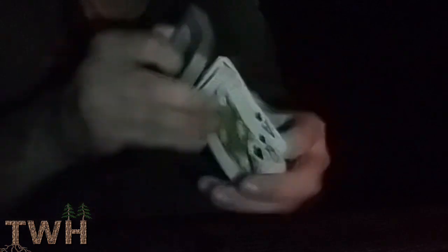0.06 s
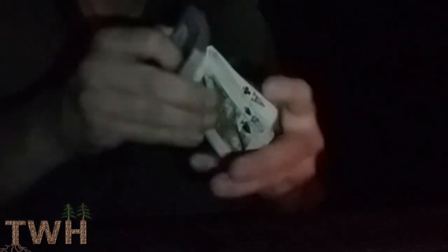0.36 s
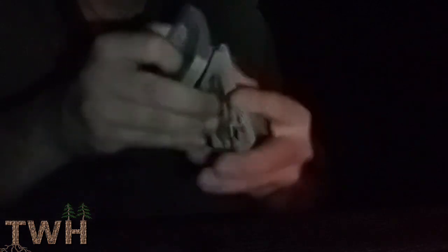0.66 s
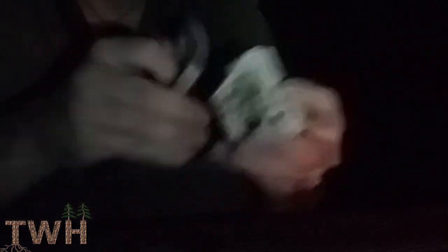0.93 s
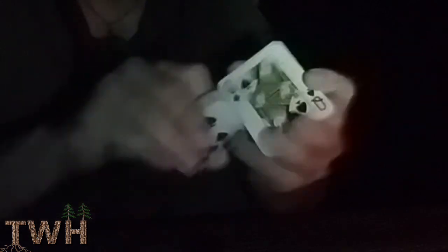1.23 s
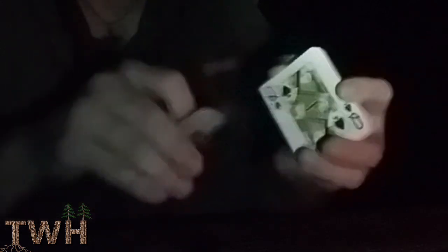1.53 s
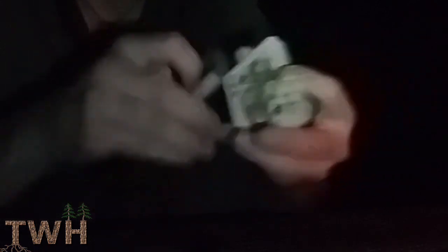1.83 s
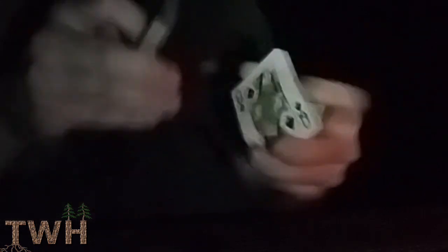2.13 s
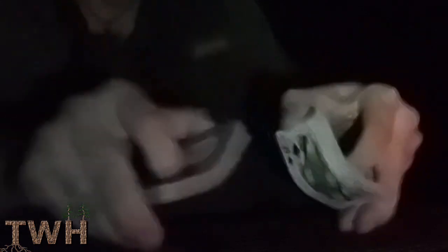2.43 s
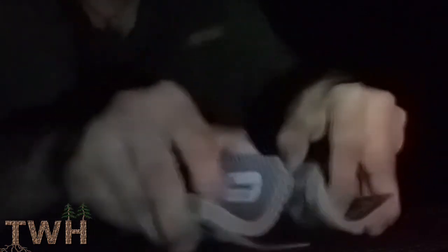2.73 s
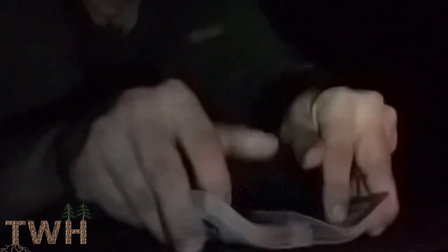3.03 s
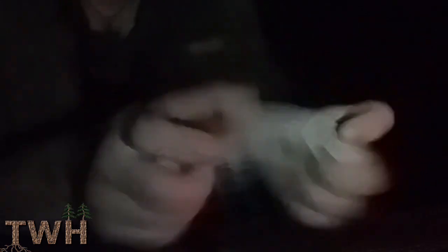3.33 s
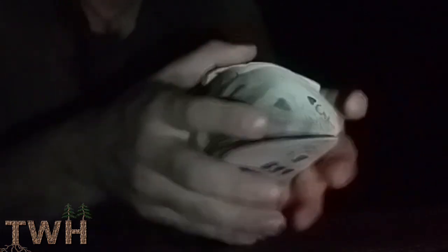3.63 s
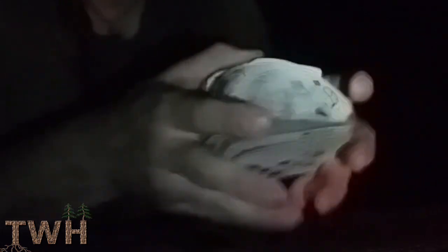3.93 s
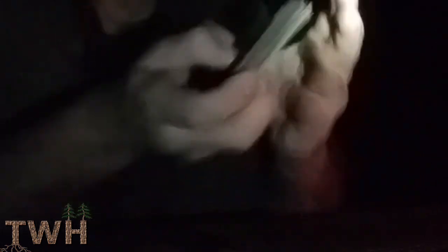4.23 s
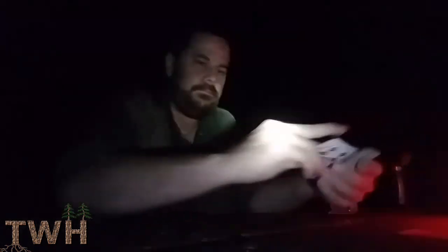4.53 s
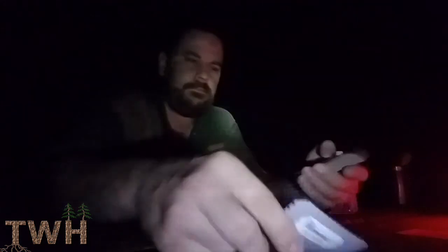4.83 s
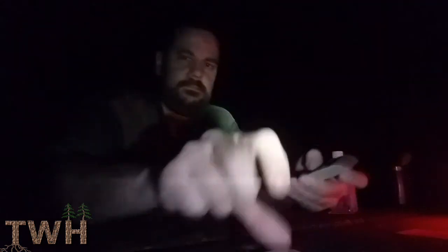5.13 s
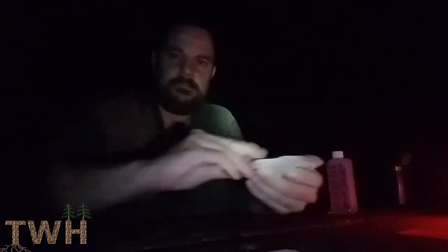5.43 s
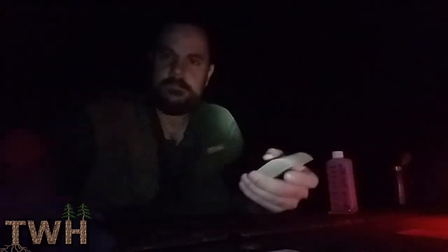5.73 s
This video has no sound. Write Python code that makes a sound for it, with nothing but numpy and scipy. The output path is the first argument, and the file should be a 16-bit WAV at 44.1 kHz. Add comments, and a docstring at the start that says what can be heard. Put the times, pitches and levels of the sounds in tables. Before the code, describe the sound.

A deck of playing cards is riffled on a table, bridged shut and dealt, with faint crickets chirring in the night air.

```python
"""Playing cards shuffled at a table outdoors at night, over crickets and spells of a faint, high buzz.
Soft slides and taps split the deck. Near 2.8 s the cards riffle off the thumbs, snap by snap and then
in a rush, and the table top booms under them; the night dips briefly. At 3.7 s the arched halves
cascade shut in a bridge and the deck is squared up. Just after 5 s a card swishes off the top,
snaps free and is laid down, and the fingers move on to the next ones."""
import sys
import numpy as np
from scipy import signal
from scipy.fft import rfft, irfft, next_fast_len
from scipy.io import wavfile

SR = 44100
rng = np.random.default_rng(int(sys.argv[2]) if len(sys.argv) > 2 else 0)


def put_to_file(sound):
    """Save the sound as 16-bit audio at rate SR, in the file named by the first command-line argument."""
    columns = np.atleast_2d(sound).T  # one column per channel
    safe = np.clip(columns, -1, 1)
    whole_steps = np.round(safe * 32767)
    wavfile.write(sys.argv[1], SR, whole_steps.astype(np.int16))


N = 263718
TIME = np.arange(N) / SR
LEAD_IN_S = .008  # how far a snap starts ahead of its crack

# tone of a sliding card: f/Hz, level/dB
SLIDE_TONE = [(60, -10), (150, -5.5), (480, 2), (780, -8.5), (1200, -1), (1900, -3), (2400, -3),
              (3100, -3.5), (4800, -1.5), (6200, -15.5), (10000, -14), (15000, -13)]
# tone of a tapped card: f/Hz, level/dB
TAP_TONE = [(50, -20), (150, 5), (450, 2), (900, 0.5), (1400, 1), (2200, 1), (3100, 3.5), (4800, -2),
            (6500, -17), (10000, -20), (15000, -22)]


def from_db(db):
    return 10 ** (np.asarray(db) / 20)


def rms_one(x):
    return x / np.sqrt(np.mean(x ** 2) + 1e-20)


def at_hz(points, hz):
    """A curve read on a log-frequency axis."""
    freqs, values = np.array(points).T
    return np.interp(np.log(hz + 1), np.log(freqs), values)


def drift(rate, size=N):
    """A random wander with `rate` turns a second and a spread near 1."""
    turns = int(size / SR * rate) + 2
    return np.interp(TIME[:size], np.arange(turns) / rate, rng.standard_normal(turns))


def swell(start, end, attack_s, release_s):
    """An envelope that rises from its start, holds until its end and dies away."""
    attack = 1 - np.exp(-np.maximum(TIME - start, 0) / attack_s)
    return attack * np.exp(-np.maximum(TIME - end, 0) / release_s)


def add(out, x, start):
    """Mixes x into out from a start time in s."""
    i = max(round(start * SR), 0)
    out[:, i:i + x.shape[1]] += x[:, :max(N - i, 0)]


def minimum_phase(db):
    """An EQ response with no pre-ring, so attacks stay crisp."""
    cepstrum = irfft(np.log(from_db(db)))
    half = len(cepstrum) // 2
    cepstrum[1:half] *= 2
    cepstrum[half + 1:] = 0
    return np.exp(rfft(cepstrum))


def stereo_image(noise, tone, likeness, balance, left_lead_s):
    """Two unrelated noises are equalised and mixed as mid and side into left and right."""
    size = 2 * next_fast_len(noise.shape[1] // 2 + 512)
    hz = np.fft.rfftfreq(size, 1 / SR)
    mid, side = rfft(noise, size) * minimum_phase(at_hz(tone, hz))
    alike, lean_db = at_hz(likeness, hz), at_hz(balance, hz) / 2
    mid, side = mid * np.sqrt(1 + alike), side * np.sqrt(1 - alike)
    left = (mid + side) * from_db(lean_db)
    right = (mid - side) * from_db(-lean_db) * np.exp(-2j * np.pi * hz * left_lead_s)
    return irfft(np.array([left, right]), size)[:, :noise.shape[1]]


def riffle():
    """Cards spring off the thumbs singly, then in a rush; the rubbing steps up as they interleave."""
    # single cards leaving the thumbs: t/s, level/dB, edge/dB
    releases = [(2.8283, -13.5, -1.5), (2.8383, -15, -10), (2.85, -17, -10), (2.8648, -15.5, -6.5),
                (2.8732, -20, -5), (2.8945, -15.5, -1.5), (2.9016, -17.5, -14), (2.911, -20, -5),
                (2.9246, -17, -12.5), (2.9416, -13.5, -11.5), (2.96, -20.5, -7), (2.9752, -22.5, -19.5),
                (2.9919, -16, -4.5), (3.009, -12.5, -4), (3.027, -13.5, -5), (3.1421, -19, -3)]
    # tone of a sprung card: f/Hz, level/dB
    tone = [(35, -53), (60, -29), (124, -12.5), (268, -11), (323, -4.5), (363, -6), (527, -2.5),
            (700, -10.5), (1780, -4.5), (2410, -6), (3940, -6), (7060, -21.5), (12400, -25.5),
            (14900, -21.5), (16000, -22)]
    loose_start, rush_start, end = 2.895, 3.035, 3.136
    loose = from_db(-39) * swell(loose_start, end, attack_s=.003, release_s=.0046)
    rush = from_db(-26.5) * swell(rush_start, end, attack_s=.003, release_s=.0046)
    out = rub(loose + rush, loose_start, tone, grain_db=3, grain_rate=550)
    out += run_of_cards(rush_start, end, tone, count=12, card_s=.0015,
                        db=-20.5, spread_db=1, body_db=-6.5, edge_db=-.5)
    for at, db, edge_db in releases:
        card = snap(tone, decay_s=.0011, rise_s=.00055, ring_s=.0042, lead_in_s=.0015)
        add(out, weigh(card, .0018, db, body_db=-6, edge_db=edge_db), at - LEAD_IN_S)
    return out


def bridge():
    """The arched halves slide home ever harder; packets slap down, each trailed by a short swish."""
    # packets slapping shut: t/s, level/dB, edge/dB
    packets = [(3.7076, -23.5, -3), (3.727, -26.5, -5), (3.7683, -22, -3), (3.7921, -25.5, -18),
               (3.799, -27, 1), (3.8653, -19, -3.5), (3.9025, -24, -3), (3.936, -25, 2.5),
               (3.9689, -20.5, 0), (3.9992, -27, 2.5), (4.0507, -18, -9), (4.0996, -23.5, -12),
               (4.128, -19.5, -27)]
    # tone of the cascade: f/Hz, level/dB
    tone = [(35, -44), (60, -22.5), (250, -11.5), (380, -3.5), (636, -14.5), (1200, -6), (2470, -4.5),
            (3120, 3.5), (3850, -6), (4970, -3.5), (7230, -14), (10800, -6.5), (12700, -10), (14900, -1.5),
            (16000, -22)]
    start, end = 3.66, 4.135
    rise_db_per_s, swish_db, swish_s = 10.5, -11.5, .012
    elapsed = np.clip(TIME, start, end) - start
    sliding = from_db(-39.8 + rise_db_per_s * elapsed) * swell(start, end, attack_s=.0068, release_s=.01)
    # the falling cards' level rides on the sliding
    out = sliding * run_of_cards(start, end, tone, count=34, card_s=.0029,
                                 db=2.5, spread_db=4.5, body_db=-4.5, edge_db=-7)
    landings = np.zeros(N)
    for at, db, edge_db in packets:
        slap = snap(tone, decay_s=.0008, rise_s=.0004, ring_db=-18, ring_s=.006, lead_in_db=-28)
        add(out, weigh(slap, .0017, db, body_db=-15, edge_db=edge_db), at - LEAD_IN_S)
        landings[round(at * SR)] = from_db(db + swish_db)
    swishes = signal.lfilter([1], [1, -np.exp(-1 / (swish_s * SR))], landings + 1e-18)
    return out + rub(np.hypot(sliding, swishes), start, tone, grain_db=2.5, grain_rate=500)


def run_of_cards(start, end, tone, count, card_s, db, spread_db, body_db, edge_db):
    """Single cards drop at uneven intervals, each with its own strength, resonance and flatness."""
    out = np.zeros((2, N))
    for slot, (late, strength, grip, flatness) in enumerate(rng.uniform(-1, 1, (count, 4))):
        at = start + (end - start) * (slot + .5 + .4 * late) / count
        tick = snap(tone, decay_s=card_s, rise_s=card_s / 3, ring_db=-22, ring_s=.004, lead_in_db=-28)
        tick = held_card(tick, hz=2200 * 2 ** grip, resonance_db=6, pan_db=0)
        tick = weigh(tick, 1.5 * card_s, db + spread_db * strength, body_db + 4 * flatness, edge_db)
        add(out, tick, at - LEAD_IN_S)
    return out


def snap(tone, decay_s, rise_s=.0003, ring_db=-20, ring_s=.007, lead_in_db=-26, lead_in_s=.0029):
    """A card cracks and its stock flutters briefly; a faint noise swells just ahead of the crack."""
    t = TIME[:SR // 20] - LEAD_IN_S
    since_crack = np.maximum(t, 0)
    attack = 1 - np.exp(-(since_crack / rise_s) ** 2)
    decay = np.exp(-since_crack / decay_s) + from_db(ring_db) * np.exp(-since_crack / ring_s)
    lead_in = from_db(lead_in_db) * np.exp(-np.abs(t) / lead_in_s)
    return friction(lead_in + attack * decay, tone, grain_db=2.5, grain_rate=2546)


def rub(envelope, start, tone, grain_db, grain_rate):
    """Cards rubbing past each other, for up to a second from a start time."""
    out = np.zeros((2, N))
    add(out, rms_one(friction(np.ones(SR), tone, grain_db, grain_rate)), start)
    return envelope * out


def friction(envelope, tone, grain_db, grain_rate):
    """Card stock catches and slips in tiny grains under an envelope."""
    # the cards' image, narrow in the bass and wide on top: f/Hz, left-right correlation
    likeness = [(100, .88), (350, .92), (800, .75), (1500, .72), (3000, .5), (6000, .3), (15000, .15)]
    # the cards' lean: f/Hz, left minus right/dB
    balance = [(100, -3), (400, -2), (1300, -1.5), (2400, 5), (4400, 6), (8000, 2), (15000, 2)]
    size = len(envelope)
    grains = rms_one(from_db(grain_db * np.clip(drift(grain_rate, size), -2, 2)))
    force = envelope * grains * rng.standard_normal((2, size))
    return stereo_image(force, tone, likeness, balance, left_lead_s=.00007)


def held_card(x, hz, resonance_db, pan_db):
    """The grip gives a card one broad resonance; a positive pan places it to the left."""
    peak = signal.lfilter(*signal.iirpeak(hz, 4.5, fs=SR), x)
    return (x + from_db(resonance_db) * peak) * from_db([[pan_db / 2], [-pan_db / 2]])


def weigh(x, length_s, db, body_db, edge_db):
    """Sets a contact's mids to db over length_s, with body (flat hits) and edge (corners) relative."""
    body_hz, edge_hz = 900, 5800
    bands = (body_hz, "low", body_db), ([body_hz, edge_hz], "band", 0), (edge_hz, "high", edge_db)
    out = 0
    for hz, kind, relative_db in bands:
        band = signal.sosfilt(signal.butter(4, hz, kind, fs=SR, output="sos"), x)
        out = out + from_db(db + relative_db) * rms_one(band)
    return out * np.sqrt(length_s * SR / x.shape[1])


def draw_card():
    """The top card swishes off the deck and flaps three times, hardest in the middle, as it comes free."""
    at, rise_s, fall_s, flap_gap_s = 5.1615, .0074, .012, .0046
    grip = dict(hz=3050, resonance_db=-.5, pan_db=2)
    out = np.zeros((2, N))
    t = TIME[:SR // 5] - .1
    envelope = np.exp(np.minimum(t / rise_s, -t / fall_s))
    swish = held_card(friction(envelope, SLIDE_TONE, grain_db=3, grain_rate=346), **grip)
    add(out, weigh(swish, (rise_s + fall_s) / 2, db=-25.5, body_db=-9, edge_db=-1.5), at + t[0])
    for k in (-1, 0, 1):
        flap = held_card(snap(TAP_TONE, decay_s=.0016), **grip)
        flap = weigh(flap, .0015, db=-23.5 - 1.5 * abs(k), body_db=-4, edge_db=1.5)
        add(out, flap, at + k * flap_gap_s - LEAD_IN_S)
    return out


def handling():
    """Splitting, squaring and dealing: sharp flicks, and sliding strokes that swell and fade."""
    # flicks and taps: t/s, length/s, level/dB, body/dB, edge/dB, card f/Hz, resonance/dB, pan/dB
    taps = [(0.1815, 0.0048, -53, -13, -21, 2090, 12, 0), (0.6, 0.0092, -60.5, -28, 7, 4150, -11, -4),
            (2.437, 0.0025, -48, -6, -25, 2220, 12, 2), (2.511, 0.024, -54.5, 4.5, -12, 960, 3, -6),
            (3.4684, 0.013, -44.5, -19, -10.5, 1920, 6, 1), (3.611, 0.0074, -46, -19, 5, 2310, -3, -2),
            (4.5745, 0.0032, -37.5, -12, -21, 1400, -21, 5), (4.872, 0.0031, -39.5, -2, -38, 875, 14, 3),
            (5.1, .0016, -31, -24, 1.5, 3730, -2, 2.5), (5.4125, 0.0033, -46.5, 2, -12, 1060, -7, 5),
            (5.4693, .0028, -42, 4, -6.5, 905, -2, 2), (5.624, 0.018, -56.5, 10, -6, 405, 5, 3.5),
            (5.836, 0.0073, -32.5, -4, -18, 1900, 22, -7)]
    # card sliding over card, finger or table:
    # middle t/s, length/s, level/dB, body/dB, edge/dB, card f/Hz, resonance/dB, pan/dB
    slides = [(.097, .086, -57, -11, -10.5, 1190, -5, 0), (1.159, .082, -59.5, -6.5, -16, 1690, -3, -1),
              (1.3529, 0.0058, -25.5, -30, -14, 1970, 8, -3), (1.357, .012, -24, -23.5, -22, 1820, 5.5, 1),
              (1.426, .027, -51, -7.5, -19, 1720, 6, -1), (3.649, 0.058, -44.5, -34, -0.5, 3090, -10, -0.5),
              (4.288, 0.055, -57.5, -8, 0.5, 2750, -1, 0), (4.45, 0.037, -55.5, -10, -3.5, 3020, 7, 0),
              (4.503, 0.089, -51.5, -9, -19, 2050, -6, 0), (4.642, 0.047, -49.5, -10, -2.5, 2550, 8, 2),
              (4.679, 0.027, -46.5, -3.5, 2, 2440, 13, -1), (4.764, .027, -61, -5, 3, 2960, -2, 4),
              (4.942, .13, -46.5, -5.5, -10.5, 2410, 6, 3.5), (5.131, .05, -50.5, -8, -2, 3480, -5, 3),
              (5.614, 0.03, -41.5, -26, -2, 2800, 17, 0), (5.874, .05, -39, -8, -11, 2050, 21, -6),
              (5.918, 0.061, -43.5, -9, -15, 2050, 8, -9.5), (5.974, 0.078, -46, -7, -12, 1490, -5, -10)]
    out = np.zeros((2, N))
    for at, length, db, body_db, edge_db, *grip in taps:
        flick = held_card(snap(TAP_TONE, decay_s=.8 * length), *grip)
        add(out, weigh(flick, length, db, body_db, edge_db), at - LEAD_IN_S)
    for at, length, db, body_db, edge_db, *grip in slides:
        t = np.arange(-length, length, 1 / SR)
        envelope = np.exp(-(t / (.45 * length)) ** 2)
        stroke = held_card(friction(envelope, SLIDE_TONE, grain_db=3.5, grain_rate=350), *grip)
        add(out, weigh(stroke, length / 2, db, body_db, edge_db), at - length)
    return out


def fingering():
    """The fingers shift on the deck between moves, rubbing in faint fits and starts."""
    # spells of rubbing: start/s, end/s, level/dB
    spells = [(.17, .48, -65.5), (2.522, 2.752, -64.5), (3.3, 3.584, -58), (4.142, 4.22, -57)]
    fits = rms_one(from_db(3.1 * np.clip(drift(40), -2, 2)))
    out = 0
    for start, end, db in spells:
        envelope = from_db(db) * swell(start, end, attack_s=.027, release_s=.035)
        out = out + rub(envelope, start, SLIDE_TONE, grain_db=3.5, grain_rate=830)
    return fits * out


def table_boom(cards):
    """The cards ring the table top's low modes, most strongly while they bear on it."""
    # modes of the table top: f/Hz, relative level/dB, t60/s
    modes = [(131, -35.5, 0.34), (216, -33, 0.12), (344, -26, 0.16), (389, -31.5, 0.064),
             (465.6, -30.5, 0.12), (597, -29, 0.05)]
    # cards pressed to the table: start/s, end/s, coupling/dB
    presses = [(2.5, 2.62, 15), (2.89, 3.14, 3), (5.61, 5.66, 1)]
    in_hand_db = -10.5
    pressed = sum(from_db(db) * swell(start, end, attack_s=.0053, release_s=.034)
                  for start, end, db in presses)
    push = cards.mean(axis=0) * (from_db(in_hand_db) + pressed) + 1e-18
    out = 0
    for hz, db, t60 in modes:
        radius, angle = from_db(-60 / (t60 * SR)), 2 * np.pi * hz / SR
        feedback = [1, -2 * radius * np.cos(angle), radius ** 2]
        out = out + signal.lfilter([from_db(db) * np.sin(angle)], feedback, push)
    return from_db(-23.5) * out


def scatter(x, t60, dull_hz):
    """Dense, dulled reflections from the things around, different for each side."""
    t = TIME[:int(t60 * SR)]
    tail = rng.standard_normal((2, len(t))) * from_db(-60 * t / t60)
    tail = signal.sosfilt(signal.butter(2, dull_hz, fs=SR, output="sos"), tail)
    tail /= np.sqrt(np.sum(tail ** 2) / 2)
    return signal.fftconvolve(np.atleast_2d(x), tail, axes=1)[:, :N]


def cricket(hz, strokes_per_s):
    """Each wing stroke is a short, uneven tone that sags in pitch."""
    stroke = (rng.random() + np.cumsum(strokes_per_s * (1 + .08 * drift(9))) / SR) % 1
    pitch = hz * (1 + .025 * (.5 - stroke) + .012 * drift(35))
    envelope = (stroke * (1 - stroke)) ** 2 * (1 + .3 * drift(3))
    return envelope * np.sin(2 * np.pi * np.cumsum(pitch) / SR)


def cricket_choruses(voices=6):
    """Groups of crickets, each spread around its pitch and blurred by distance."""
    # choruses: f/Hz, spread/Hz, wing stroke rate/Hz, level/dB
    choruses = [(2270, 68, 48, -58.5), (4310, 50, 39, -56), (4328, 200, 55, -60.5)]
    rank = (np.arange(voices) + .5) / voices
    detunes = rms_one(np.log(rank / (1 - rank)))  # bunched near the centre pitch
    out = 0
    for hz, spread_hz, strokes_per_s, db in choruses:
        chorus = sum(cricket(hz + spread_hz * k, strokes_per_s * rng.uniform(.75, 1.25)) for k in detunes)
        out = out + from_db(db) * rms_one(scatter(chorus, t60=.25, dull_hz=9000))
    return out


def faint_high_buzz():
    """A faint tone near 5 kHz, roughened by fast pitch jitter, comes and goes in spells."""
    # buzzes: start/s, end/s, f/Hz, level/dB
    buzzes = [(.38, 0.702, 5030, -72.5), (1.42, 1.82, 5090, -70), (1.875, 2.22, 4980, -70.5),
              (4.55, 4.88, 5180, -69)]
    out, fade_s = 0, .021
    for start, end, hz, db in buzzes:
        gate = np.clip(np.minimum(TIME - start, end - TIME) / fade_s, 0, 1)
        pitch = hz * (1 + .018 * drift(300))
        out = out + from_db(db) * gate * np.sin(2 * np.pi * np.cumsum(pitch) / SR)
    return scatter(out, t60=.16, dull_hz=8830)


def night_air():
    """A faint bed of low night air with a thin, wide hiss on top."""
    # tone of the air and hiss: f/Hz, relative level/dB
    tone = [(25, -24.5), (60, -6), (130, 2.5), (250, -5.5), (450, -10), (850, -13), (1100, -19),
            (2000, -19), (3500, -23), (6000, -31), (10000, -30), (15000, -27.5)]
    # image of the air: f/Hz, left-right correlation
    likeness = [(100, .88), (300, .8), (800, .4), (2000, .1), (15000, 0)]
    noise = rng.standard_normal((2, N))
    air = stereo_image(noise, tone, likeness, balance=[(100, -1.9), (2000, -.46)], left_lead_s=0)
    return from_db(-59.5) * rms_one(air)


def scene():
    """Cards close by on the table; the night all around dips for a moment after the riffle."""
    cards = riffle() + bridge() + draw_card() + handling() + fingering()
    air = night_air()
    reflections = from_db(-23) * scatter(cards, t60=.13, dull_hz=3500)
    night = cricket_choruses() + faint_high_buzz() + air
    dip = from_db(-4 * swell(3.1, 3.47, attack_s=.16, release_s=.16))
    return cards + table_boom(cards) + reflections + dip * night


def record(dry):
    """Soft clipping rounds off the loudest snaps, and the top is cut steeply at 16 kHz."""
    rounded = .9 * np.tanh(dry / .9)
    return signal.sosfilt(signal.ellip(10, .3, 80, 16000, fs=SR, output="sos"), rounded)


dry = scene()
out = record(dry)
put_to_file(out)
```